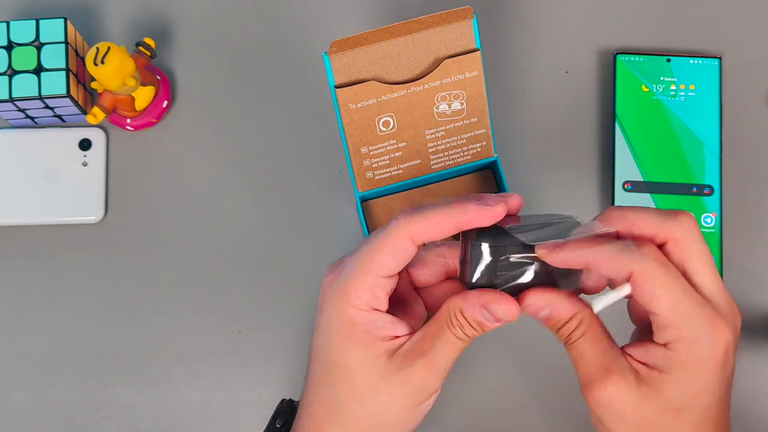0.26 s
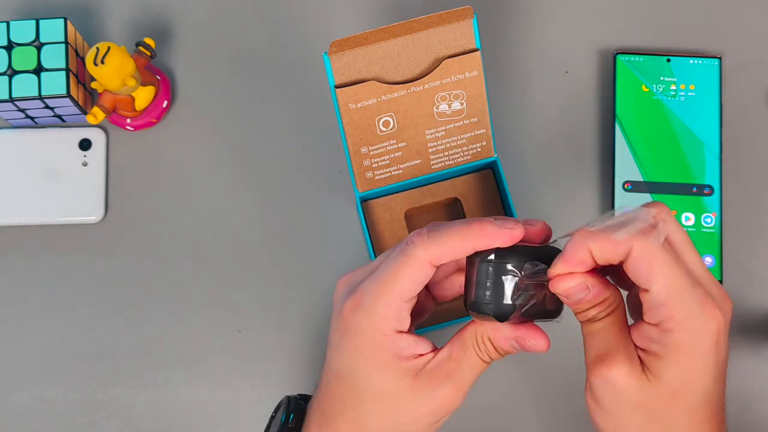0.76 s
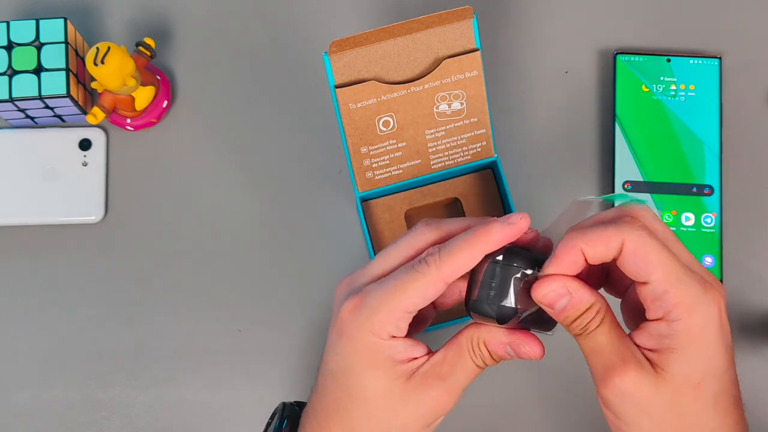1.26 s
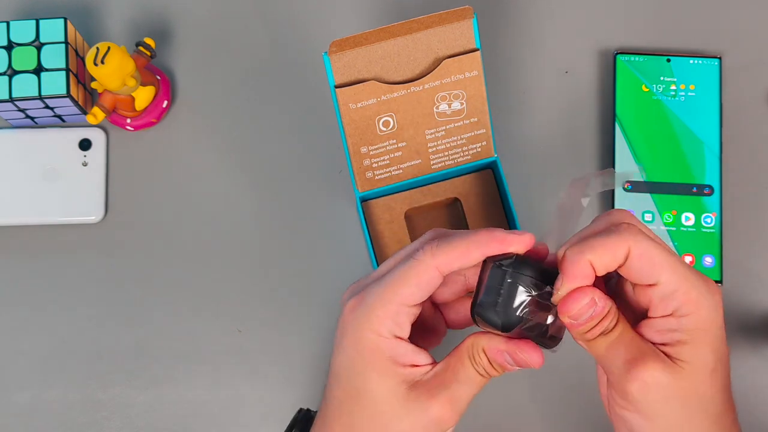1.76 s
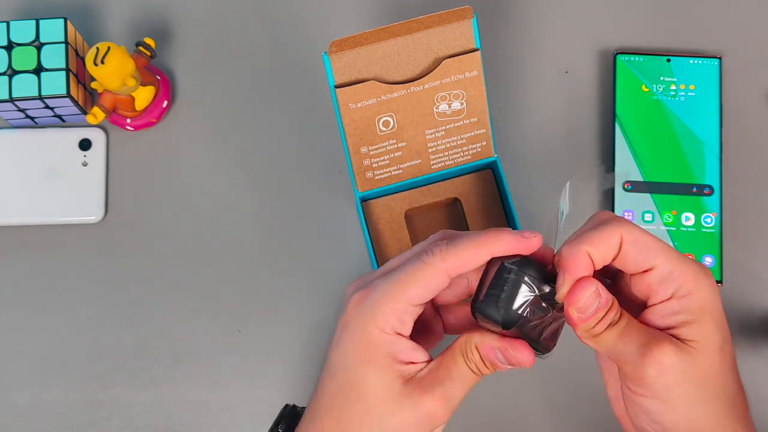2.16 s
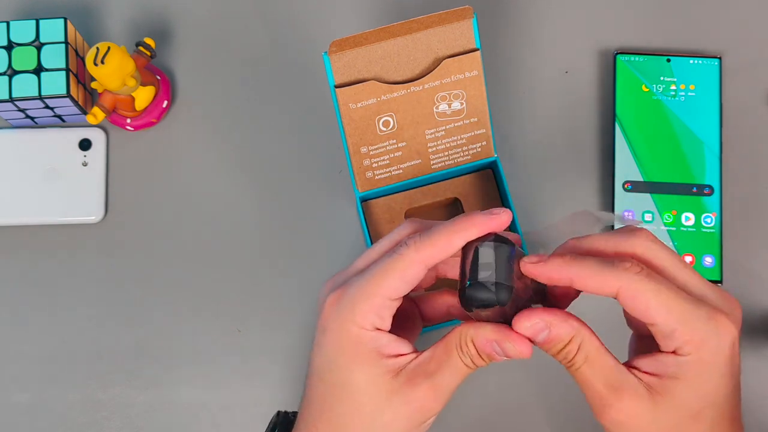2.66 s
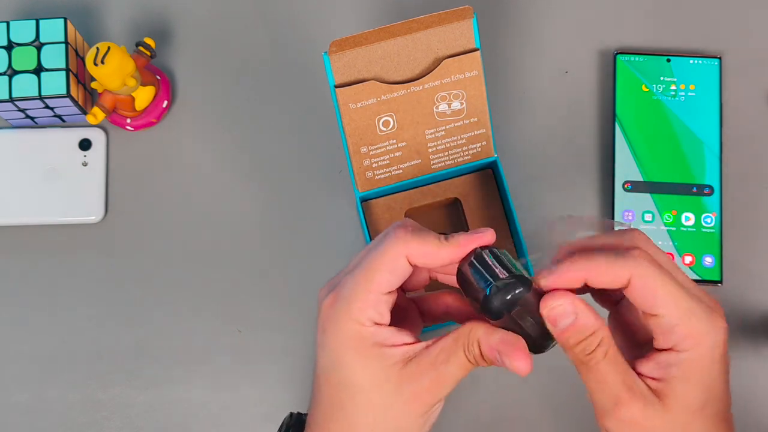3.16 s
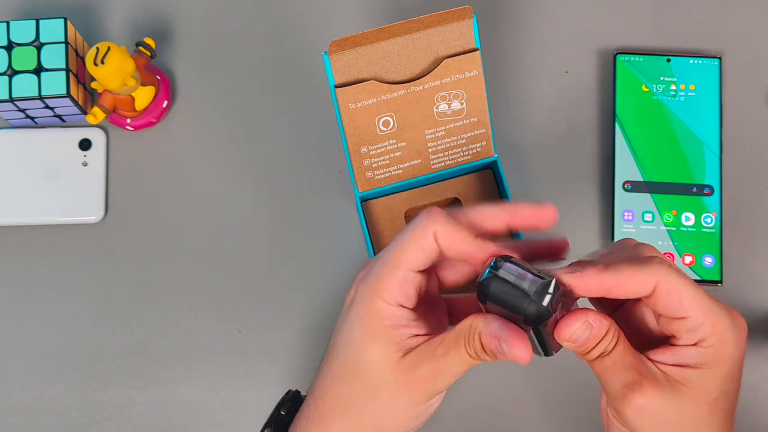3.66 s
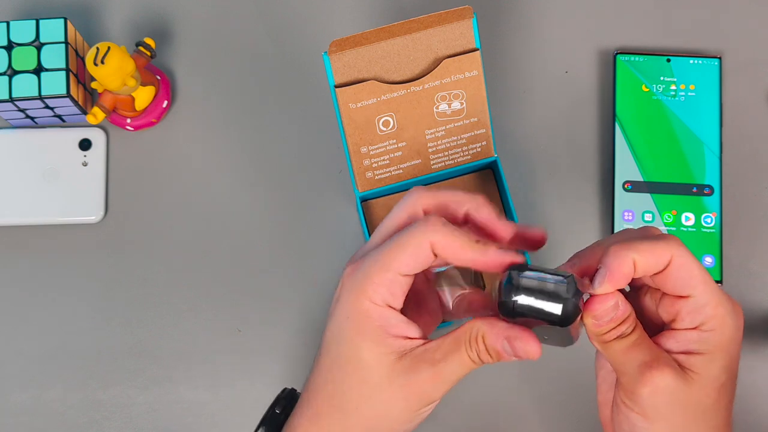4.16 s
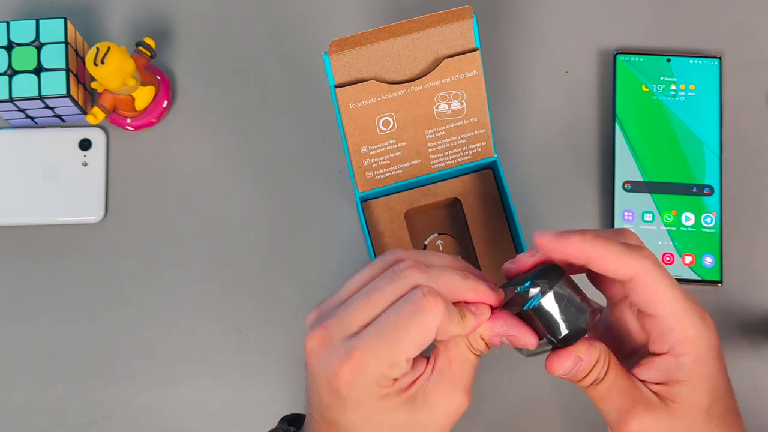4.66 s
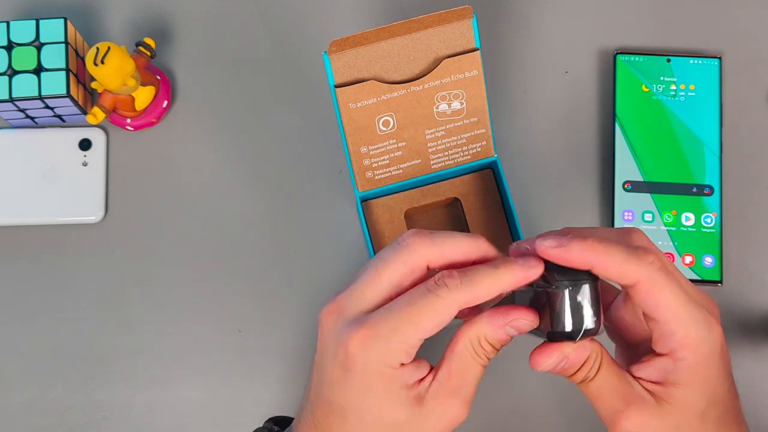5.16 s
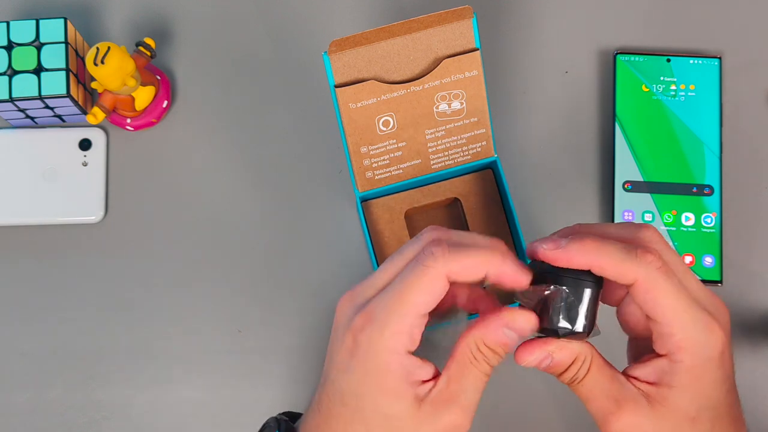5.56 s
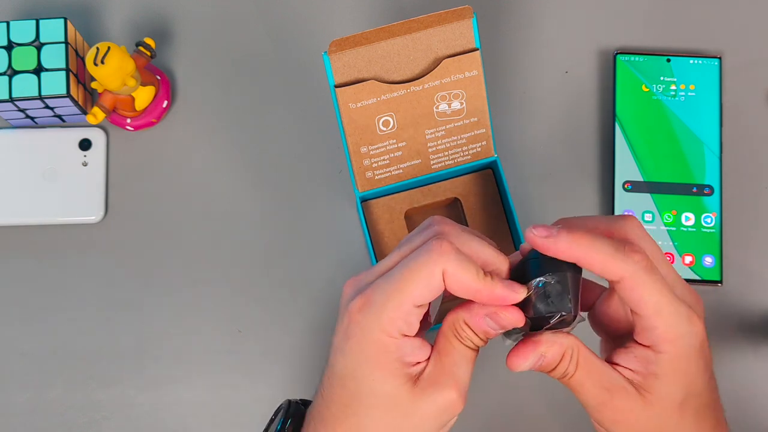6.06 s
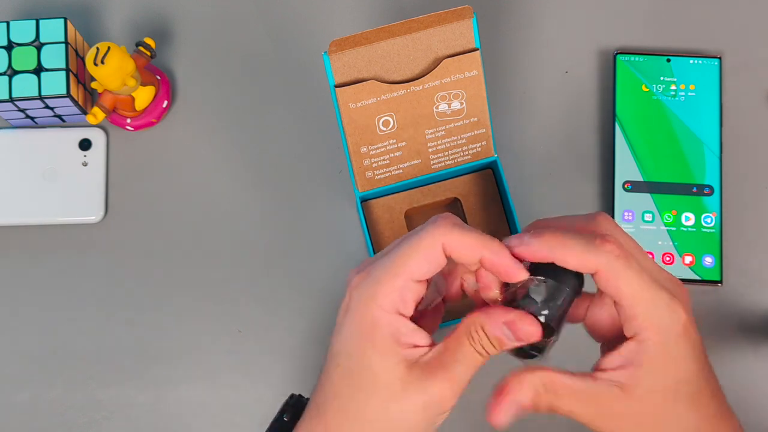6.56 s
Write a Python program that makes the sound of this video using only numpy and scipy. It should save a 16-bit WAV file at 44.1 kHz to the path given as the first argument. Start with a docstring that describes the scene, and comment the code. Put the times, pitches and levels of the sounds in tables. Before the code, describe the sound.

Close, dry crackling of clear plastic wrap, sparse at first, then a busy run of crisp snaps with soft rubs and faint bumps on a case.

```python
"""Fingers peel a stiff clear film off a small plastic case, close to a microphone in a small room.
They rub the film and bump the case, by friction grains and damped noise bursts, from the start onward.
After a few early snaps the film lets go in one short stick-slip zip, a train of brief noise bursts.
Pulled round, it then buckles in many sharp snaps, each a flash of film-coloured noise, amid fine crackle.
The room rings briefly after each sound, as decaying noise, over steady air noise and a faint low hum."""
import sys
import numpy as np
from scipy import signal
from scipy.fft import rfft, irfft
from scipy.io import wavfile

SR = 44100
rng = np.random.default_rng(int(sys.argv[2]) if len(sys.argv) > 2 else 0)


def output_pcm(signal):
    """Save a mono or channel-first signal as 16-bit PCM at the path in sys.argv[1].

    Samples are clipped to [-1, 1] before scaling.
    """
    pcm = np.clip(np.atleast_2d(signal).T, -1, 1) * 32767
    wavfile.write(sys.argv[1], SR, np.round(pcm).astype(np.int16))


N = 300762

# buckling creases: (time [s], level with the energy spread over 8 ms [dB], low-end lift [dB],
# treble slope [dB per octave])
CREASE_SNAPS = [(0.1749, -41.5, 20, 1), (0.2405, -43.5, 16, 17), (0.4274, -47, -15, 4),
                (0.5451, -35.5, -26, -15.5), (0.5665, -56, -17, -18), (0.5902, -40.5, -26, -16),
                (0.7749, -49, -1, -12.5), (0.9851, -49.5, -46, -2.5), (1.0663, -43.5, -15, 6),
                (1.284, -48.5, 44, 7.5), (1.361, -41.5, -27, 1.5), (1.437, -39, -11, -1),
                (1.7209, -29, -6, 1.5), (1.785, -19, -8.5, -4), (2.12, -51, -21, -17.5),
                (2.196, -36, -33, -3.5), (2.3773, -30.0, -29, -5.5), (2.3957, -32, 21.5, 9),
                (2.4081, -32.5, 25, 13.5), (2.747, -65, 46.5, -21), (2.9032, -48.5, -17, -1),
                (3.0205, -33, 14.5, 8.5), (3.1302, -50, 6.5, 0.5), (3.2858, -53, -8, -5),
                (3.3203, -34.5, -0.5, -2), (3.3324, -24, 3, 8.5), (3.4335, -35, 29, 7.5),
                (3.489, -31.5, 21, 11), (3.5137, -35.0, 1, -4), (3.8403, -35, 35, 11),
                (3.8842, -34.5, -31, -12), (3.9038, -23.5, -7, 6), (3.929, -22.5, -2.5, 1),
                (4.0381, -31.5, -17, -7.5), (4.0577, -30.5, 4, 0), (4.121, -36, 0, 1),
                (4.287, -29, 16, 2.5), (4.349, -32, 26, 10.5), (4.3959, -32.5, 19, 5.5),
                (4.408, -38, 13, 4), (4.522, -38.5, 1, 7.5), (4.678, -36.5, -1, -1.5),
                (4.6953, -31.5, 11.5, 0.5), (4.7921, -32, 9.5, 5.5), (4.822, -26.5, 3, 14.5),
                (4.845, -32, -26, -4.5), (4.911, -33.0, -5, -0.5), (4.9504, -34, 8, -4),
                (5.0895, -38, 18, -1), (5.097, -24.5, 4, -0.5), (5.1768, -37, -3, 2),
                (5.2943, -35.5, -46, -8), (5.358, -43, 5, -2.5), (5.4294, -35.0, 5, -5.5),
                (5.4662, -31.5, 1.5, -2.5), (5.656, -43, 25, 7.5), (5.853, -27.0, -5.5, 3),
                (5.9412, -37.5, 6, 1.5), (5.9947, -32.5, 2.5, -3), (6.0467, -35.5, -1, 3),
                (6.0582, -39.5, 0, -3), (6.0856, -35.0, -25, -7), (6.105, -29, 7, 3.5),
                (6.1791, -37.5, -14, -16.5), (6.1925, -31.5, -1, 15.5), (6.2624, -47, -20, -18),
                (6.3427, -43.5, -32, -11), (6.4109, -40, 16, 2.5), (6.4185, -28.5, 12, 12),
                (6.4573, -28.5, 11.5, 6), (6.5136, -31.5, -17, -2), (6.5202, -29, 18.5, 9.5),
                (6.5578, -38.5, 11, 6.5), (6.5855, -43, -1, -19), (6.6198, -42.0, 12, 3),
                (6.6774, -30.0, -2, 11.5), (6.761, -35.5, 2, -1.5), (6.8065, -32.0, -25, -10.5)]
# ring of the film stretched on the case: (frequency [Hz], level [dB])
FILM_RING = [(300, -9), (620, -22), (850, -4), (1400, -4), (2050, 3), (3400, 3), (5200, 4), (6400, -2.5),
             (8700, 3), (13000, -4)]
# the film unsticking: (time [s], slip rate [1/s], level [dB])
UNSTICKING = [(0.47, 155, -57), (0.49, 117, -47.5), (0.504, 150, -43), (0.506, 290, -38.5),
              (0.533, 460, -40.5), (0.548, 113, -43)]
# spectrum of one unsticking slip: (frequency [Hz], relative density [dB per Hz])
SLIP_SPECTRUM = [(590, -60), (1000, -24), (1260, -19), (1730, -30), (2030, -8), (3460, -16), (3840, -19),
                 (5830, -7), (6250, -8), (8360, -2.5), (16000, -23)]
# film sliding under the fingers: (time [s], length [s], level [dB])
FINGER_RUBS = [(-.04, .1, -50), (0.231, 0.021, -47), (.371, 0.04, -56.5), (1.188, 0.03, -54.5),
               (1.304, 0.032, -54), (1.408, .05, -61), (1.639, 0.053, -47), (2.362, 0.025, -49.5),
               (3.272, 0.064, -55), (3.453, 0.047, -44), (3.743, 0.24, -53.5), (3.838, 0.032, -40),
               (4.23, 0.045, -45), (4.262, 0.13, -44.5), (5.122, 0.085, -50), (5.639, 0.047, -52.5),
               (5.733, 0.26, -59.5), (6.388, 0.023, -49), (6.55, 0.076, -58)]
# spectrum of a small patch of film: (frequency [Hz], relative density [dB per Hz])
PATCH_SPECTRUM = [(300, 2.5), (1000, -8), (2100, 4), (3500, -1), (5500, 4.5), (9000, 4), (12000, -2),
                  (16000, -7.5)]
# fingers bumping the case: (time [s], thud level [dB], hollow knock level [dB])
CASE_BUMPS = [(.176, -50.5, -56), (.226, -58, -66), (2.394, -62, -55), (3.478, -53, -75), (3.843, -66, -57),
              (4.118, -54.5, -61), (4.287, -51, -51.5), (4.347, -55, -61), (5.096, -49, -46.5),
              (5.463, -67, -49.5), (5.853, -65, -54), (5.995, -54, -54), (6.456, -69, -57)]
# spectrum of the thud: (frequency [Hz], relative density [dB per Hz])
THUD_SPECTRUM = [(25, -23), (55, -11), (105, 3), (170, -12), (300, -24.5), (800, -67)]
# spectrum of the hollow knock: (frequency [Hz], relative density [dB per Hz])
KNOCK_SPECTRUM = [(80, -73), (170, -0.5), (260, -7.5), (400, -5), (600, -25), (1500, -26.5)]
# echoes from the nearest walls: (delay [s], level [dB])
WALL_ECHOES = [(0.02, -22.5), (0.0231, -28.5)]
# reverberation time of the room: (frequency [Hz], time to fall 60 dB [s])
REVERB_TIME = [(200, 0.75), (2100, 0.47), (7000, 0.46), (15000, 0.27)]
# colour of the room's tail: (frequency [Hz], level [dB])
REVERB_COLOUR = [(150, 2.5), (700, 1), (2000, 1.5), (4000, 0.5), (7500, 4), (11000, 0.5), (15500, -2)]
# spectrum of the still room air: (frequency [Hz], relative density [dB per Hz])
AIR_SPECTRUM = [(25, -14), (60, -6.5), (115, 3), (220, -4.5), (500, -14.5), (1300, -19.5), (4000, -28),
                (9000, -27), (16000, -30.5)]

AIR_DB, HUM_HZ, HUM_DB = -63.5, 98.5, -71
LOWEST_HZ, CUT_HZ = 420, 16000  # the small sheet radiates little below the first; upper band limit
BODY_HZ, SHARP_HZ = 1960, 3120  # the low-end lift lies below the first, the treble slope above the second
FLIP_S, FLIP_SPREAD = 0.00098, 0.25  # typical time for a crease to flip, and its spread (log ratio)
# a snap harder than HARD_DB shakes the whole sheet: a hollow dip deepens with every dB beyond it
HARD_DB, HOLLOW_DB_PER_DB, HOLLOW_HZ, HOLLOW_WIDTH_HZ = -27, 2.0, 5520, 1220


def snaps(ring_db=-20, ring_s=0.022, warn_db=-20, warn_s=0.0022):
    """Snap-through buckling: a crease flips in about a millisecond, then the sheet flutters out."""
    t = np.arange(1536) / SR
    level_window = int(0.008 * SR)
    hz = np.fft.rfftfreq(len(t), 1 / SR)
    radiates = signal.butter(4, (LOWEST_HZ, CUT_HZ), "bandpass", fs=SR, output="sos")
    out = np.zeros(N)
    for s, level_db, body_db, sharp_db in CREASE_SNAPS:
        flip_s = FLIP_S * np.exp(FLIP_SPREAD * rng.standard_normal())
        u = t / flip_s
        flip = u * np.exp(1 - u)
        ring = amp(ring_db) * (1 - np.exp(-u)) * np.exp(-t / ring_s)
        tone = read(FILM_RING, hz) + snap_tone(hz, level_db, body_db, sharp_db)
        flutter = irfft(rfft(rng.standard_normal(len(t))) * amp(tone) * (hz < CUT_HZ))
        sound = signal.sosfilt(radiates, flutter * (flip + ring))
        sound *= amp(level_db) * np.sqrt(level_window) / np.linalg.norm(sound)
        add(out, s, sound)
        # about half of the creases tick faintly just before they go
        lead, give = rng.random(2)
        add(out, s - warn_s * (0.5 + lead), amp(warn_db) * max(2 * give - 1, 0) * sound)
    return out


def snap_tone(hz, level_db, body_db, sharp_db):
    """Radiation spectrum of a crease in dB: body, treble slope, and the hollow dip of a hard snap."""
    body = body_db / (1 + (hz / BODY_HZ) ** 2)
    treble = sharp_db * np.log2(np.hypot(hz / SHARP_HZ, 1))
    depth_db = HOLLOW_DB_PER_DB * max(level_db - HARD_DB, 0)
    hollow = depth_db * np.exp(-((hz - HOLLOW_HZ) / HOLLOW_WIDTH_HZ) ** 2)
    return body + treble - hollow


def unstick(jitter=0.07):
    """Stick-slip release: the clinging film lets go in slips of about 2 ms at a varying rate."""
    s, rate, db = np.transpose(UNSTICKING)
    t = np.arange(N) / SR
    slips_so_far = np.cumsum(np.interp(t, s, rate, left=0, right=0)) / SR
    slip_times = t[1:][np.diff(np.floor(slips_so_far + 0.5)) > 0]
    age = np.arange(512) / SR
    shape = np.sqrt(age) * np.exp(-(age / 0.0017) ** 2)
    out = np.zeros(N)
    for at in slip_times:
        period = 1 / np.interp(at, s, rate)
        slip = colour(rng.standard_normal(len(age)), SLIP_SPECTRUM) * shape
        # the level counts over one slip period
        slip *= amp(np.interp(at, s, db)) * np.sqrt(period * SR) / np.linalg.norm(slip)
        add(out, at + jitter * period * rng.standard_normal(), slip)
    return out


def crackle(idle_per_s=12, busy_per_s=55, settle_s=0.057, level_db=-46, spread_db=2.5, strain_db=11.5):
    """Strain relaxation: tiny creases tick at random, louder and more often just after a snap."""
    starts = np.bincount((np.array(CREASE_SNAPS)[:, 0] * SR).astype(int), minlength=N)[:N]
    strain = signal.lfilter([1], [1, -np.exp(-1 / (settle_s * SR))], starts)
    strain = np.minimum(strain, 2)
    fires = rng.random(N) < (idle_per_s + busy_per_s * strain) / SR
    spread = spread_db * np.minimum(rng.exponential(1, N), 2)
    size = amp(level_db + spread + strain_db * strain)
    return grains(fires * size, 0.0023, PATCH_SPECTRUM)


def rubs(per_s=1000, spread_db=2.5):
    """Sliding friction: the film catches and slips in a dense run of uneven grains."""
    fires = rng.random(N) < per_s / SR
    clicks = fires * amp(spread_db * np.minimum(rng.exponential(1, N), 2))
    texture = grains(clicks, 0.00034, PATCH_SPECTRUM)
    out = np.zeros(N)
    for s, length, db in FINGER_RUBS:
        stroke = texture[max(int(s * SR), 0):][:max(int(length * SR), 64)]
        stroke = stroke * signal.windows.tukey(len(stroke), 0.6)
        add(out, s, amp(db) * unit(stroke))
    return out


def grains(clicks, decay_s, tone, count=24):
    """Impulse response: each click rings one of many small patches of film."""
    t = np.arange(384) / SR
    envelope = (1 - np.exp(-t / 0.00049)) * np.exp(-t / decay_s)
    patches = colour(rng.standard_normal((count, len(t))), tone) * envelope
    which = rng.integers(0, count, len(clicks))
    out = np.zeros(len(clicks))
    for k, patch in enumerate(patches):
        patch = patch / np.linalg.norm(patch)
        out += signal.oaconvolve(clicks * (which == k), patch)[:len(clicks)]
    return out


def bumps(thud_s=0.0067, knock_s=0.017, rise_s=0.0017):
    """Damped impact: soft fingertips give the hollow case a low thud and a quickly damped knock."""
    t, out = np.arange(8192) / SR, np.zeros(N)
    level_window = int(0.02 * SR)  # levels count over the first 20 ms
    for s, thud_db, knock_db in CASE_BUMPS:
        parts = (thud_db, THUD_SPECTRUM, thud_s), (knock_db, KNOCK_SPECTRUM, knock_s)
        for db, tone, decay_s in parts:
            envelope = (1 - np.exp(-t / rise_s)) * np.exp(-t / decay_s)
            blow = colour(rng.standard_normal(len(t)), tone) * envelope
            add(out, s, amp(db) * blow / np.std(blow[:level_window]))
    return out


def reflect(x):
    """Specular reflection: the direct sound with its first single echoes."""
    out = x.copy()
    for delay, db in WALL_ECHOES:
        add(out, delay, amp(db) * x)
    return out


def room(x, wet_db=-6.5, build_s=0.0014):
    """Diffuse reverberation: a tail of decaying noise whose treble dies first."""
    size = 32768
    hz, t, z = signal.stft(rng.standard_normal(size), SR, nperseg=256)
    decay = amp(-60 * t / read(REVERB_TIME, hz)[:, None])
    tail = signal.istft(z * decay, SR, nperseg=256)[1][:size]
    tail = colour(tail / np.linalg.norm(tail), REVERB_COLOUR)
    build = 1 - np.exp(-np.arange(size) / SR / build_s)
    fade = np.minimum(np.linspace(10, 0, size), 1)  # over the last tenth
    tail *= amp(wet_db) * build * fade
    return signal.fftconvolve(x, tail)[:N]


def background(waver=0.33):
    """Stationary noise and modulation: still room air and a hum wavering in phase and level."""
    drift = unit(colour(rng.standard_normal(N), [(1, -17), (6, -5), (25, -66), (100, -120)]))
    hum = np.sin(2 * np.pi * HUM_HZ * np.arange(N) / SR + drift) * (1 + waver * drift)
    air = colour(rng.standard_normal(N), AIR_SPECTRUM)
    return amp(AIR_DB) * unit(air) + amp(HUM_DB) * unit(hum)


def amp(db):
    """Decibel law: the amplitude ratio of a level in dB."""
    return 10 ** (np.asarray(db) / 20)


def unit(x):
    """Mean power: scales a signal to rms 1."""
    return x / np.sqrt(np.mean(x ** 2) + 1e-20)


def read(points, hz):
    """Logarithmic pitch: interpolates a table on a log-frequency axis."""
    f, value = np.transpose(points)
    return np.interp(np.log(hz + 1), np.log(f + 1), value)


def colour(x, points):
    """Linear filtering: shapes the last axis by a (frequency [Hz], level [dB]) table."""
    n = x.shape[-1]
    return irfft(rfft(x) * amp(read(points, np.fft.rfftfreq(n, 1 / SR))), n)


def add(mix, s, sound):
    """Superposition: adds a sound into the mix at time s, trimmed to fit."""
    at = int(round(s * SR))
    sound = sound[max(-at, 0):]
    part = mix[max(at, 0):][:len(sound)]
    part += sound[:len(part)]


def scene(count=6):
    """Directivity: the film radiates differently each way; one faces the microphone, all feed the room."""
    handling = crackle() + rubs() + bumps()
    directions = [snaps() + unstick() + handling for _ in range(count)]
    tail = sum(room(x) for x in directions) / np.sqrt(count)
    return (reflect(directions[0]) + tail + background())[None]


def record(dry, low_cut_hz=48):
    """Band limiting: the microphone's bass roll-off and the recorder's upper limit."""
    bass_cut = signal.butter(2, low_cut_hz, "highpass", fs=SR, output="sos")
    band_limit = signal.firwin(255, CUT_HZ, window=("kaiser", 8), fs=SR)
    return signal.oaconvolve(signal.sosfilt(bass_cut, dry), band_limit[None], "same")


dry = scene()
out = record(dry)
output_pcm(out)
```